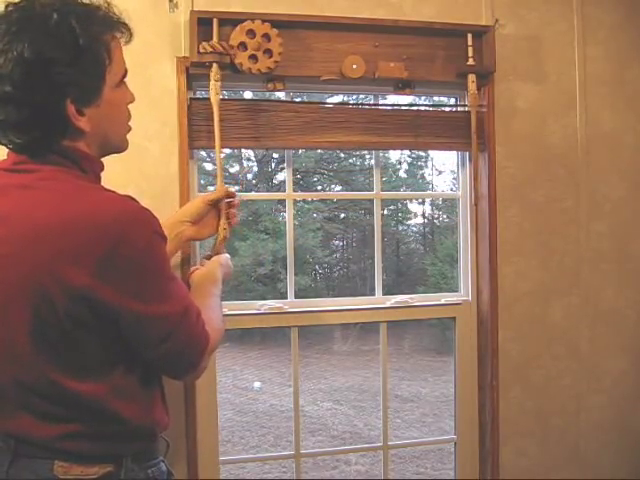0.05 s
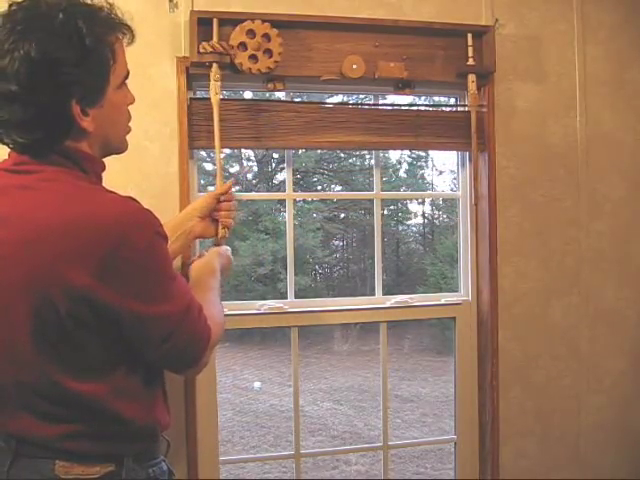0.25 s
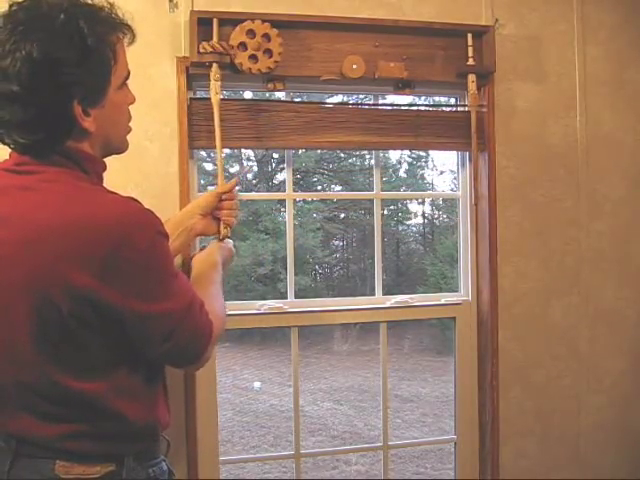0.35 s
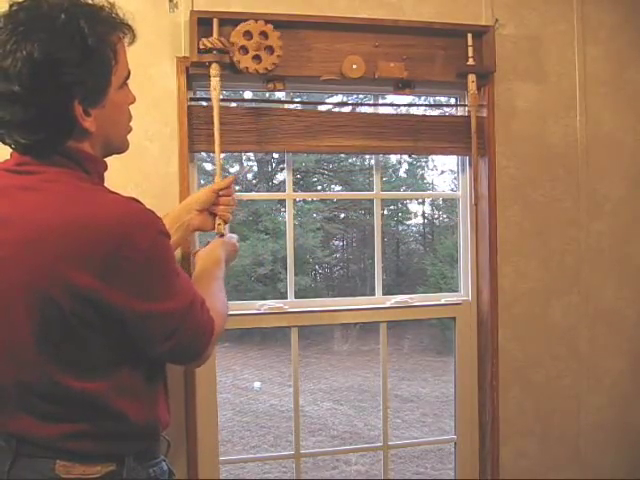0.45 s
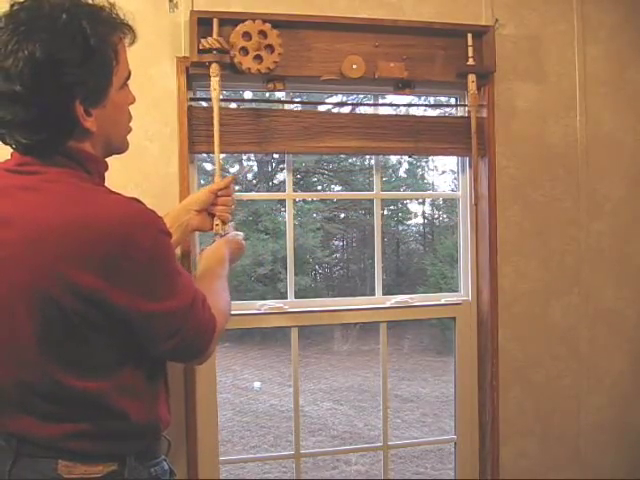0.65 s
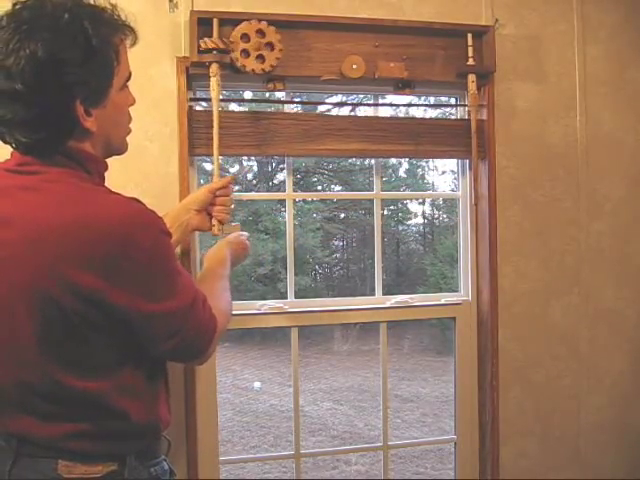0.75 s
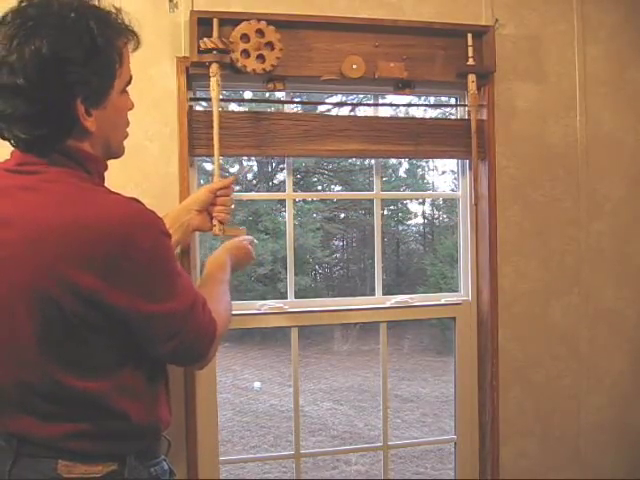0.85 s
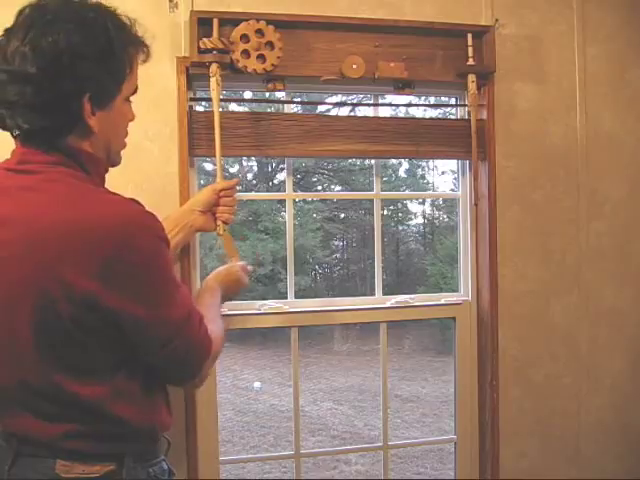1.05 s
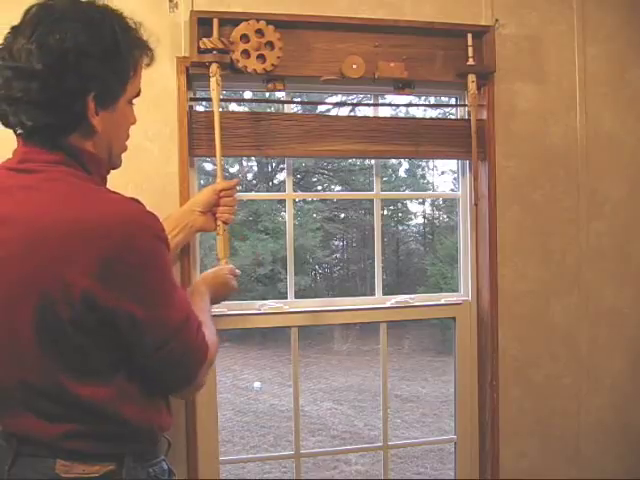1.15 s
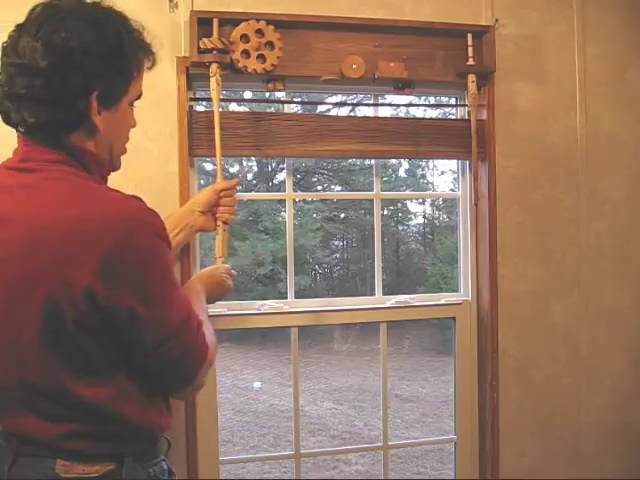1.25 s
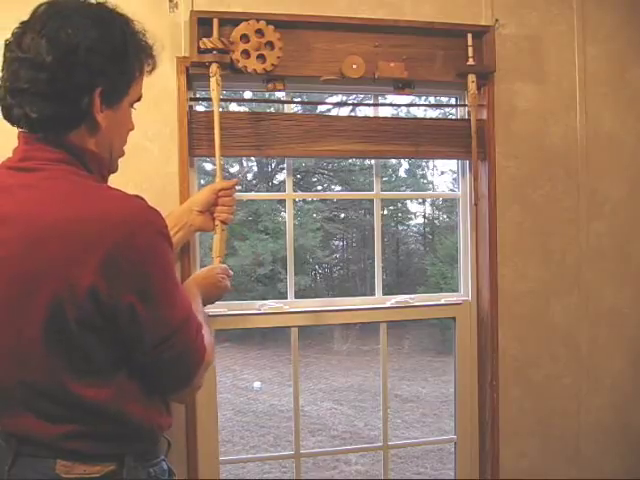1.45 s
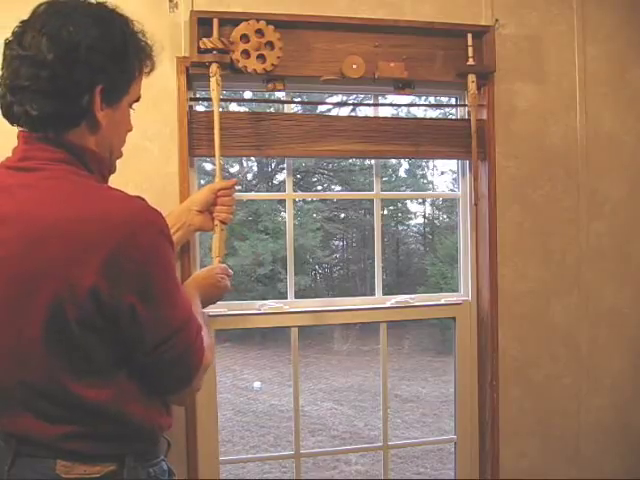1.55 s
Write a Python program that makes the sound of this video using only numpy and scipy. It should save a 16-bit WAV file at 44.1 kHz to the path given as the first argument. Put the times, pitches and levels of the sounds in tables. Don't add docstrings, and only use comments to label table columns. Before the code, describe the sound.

A wooden blind clacks and rattles down beside a window, then settles with light knocks

```python
import sys
import numpy as np
from scipy import signal
from scipy.fft import rfft, irfft, next_fast_len
from scipy.io import wavfile
from scipy.ndimage import uniform_filter1d, map_coordinates

SR = 44100
rng = np.random.default_rng(int(sys.argv[2]) if len(sys.argv) > 2 else 0)


def wav_out(sig):
    wavfile.write(sys.argv[1], SR, np.round(np.clip(np.atleast_2d(sig).T, -1, 1) * 32767).astype(np.int16))


def ratio(d):
    e = np.asarray(d, float) / 20
    return 10 ** e


N = 70560


def unit(x):
    return x / np.sqrt(np.mean(x ** 2) + 1e-20)


def along(points, hz):
    f, v = np.transpose(points)
    return np.interp(np.log(hz + 1), np.log(f + 1), v)


def wobble(rate):
    knots = rng.standard_normal(int(N * rate / SR) + 4)
    return map_coordinates(knots, [np.arange(N) * rate / SR])


def filtered(x, response):
    m = next_fast_len(len(x) + 8192)
    return irfft(rfft(x, m) * response(np.fft.rfftfreq(m, 1 / SR)), m)[:len(x)]


def coloured_noise(grains, spectrum):
    return unit(filtered(grains, lambda hz: ratio(along(spectrum, hz))))


def ring(modes, t, scatter_db, detune):
    hz, db, t60 = np.transpose(modes)[:, :, None]
    level, tuning, sign = rng.standard_normal((3, len(hz), 1))
    decay = np.sign(sign) * ratio(db + scatter_db * level - 60 * t / t60)
    tones = decay * np.sin(2 * np.pi * hz * (1 + detune * tuning) * t)
    return np.sum(tones, axis=0) / np.sqrt(len(hz))


# frequency in Hz, t60 in seconds.
ROOM_DECAY = [(100, 0.36), (500, 0.47), (2500, 0.41), (5500, 0.33)]
ROOM_DB, ROOM_DELAY_S = -2.5, 0.006


def room(x):
    hz, t, z = signal.stft(rng.standard_normal(SR // 3), SR, nperseg=512)
    decay = ratio(-60 * t / along(ROOM_DECAY, hz)[:, None])
    tail = signal.istft(z * decay, SR, nperseg=512)[1]
    delayed = np.pad(x, (round(ROOM_DELAY_S * SR), 0))
    return signal.fftconvolve(delayed, tail / np.linalg.norm(tail))


def add(out, s, sound, room_db):
    for part in (sound, ratio(room_db) * room(sound)):
        out[round(s * SR):][:len(part)] += part


# start in
# seconds, peak of the tick in dB, knock in dB, crack in dB, pitch of the struck piece in Hz.
CONTACTS = [(0.045, -43.5, -33.5, -62, 1341), (0.051, -39, -38, -35, 760), (0.174, -44, -39, -51, 717),
            (0.2337, -30.5, -26, -20, 2500), (.243, -23.5, -25, -27, 775),
            (0.224, -45.5, -29.5, -39, 724), (0.258, -45, -36, -39, 1080), (0.271, -43, -28, -37, 389),
            (0.273, -30.5, -29, -31, 1109), (0.3377, -29.5, -31, -26, 1410),
            (.341, -45, -31.5, -22, 857), (.476, -22, -27.5, -19.5, 437),
            (0.486, -27.5, -22, -27, 1282), (0.493, -13.5, -37.5, -43, 589),
            (.499, -19.5, -21.5, -20, 410.7), (0.5106, -13.5, -20.5, -27.5, 591),
            (.504, -17.5, -23, -14, 685), (.517, -16.5, -20.5, -35, 2580), (.524, -20, -22, -18, 480),
            (.542, -22, -22.5, -19.5, 2210), (.575, -30.5, -24.5, -21, 590),
            (.533, -25, -23.5, -21, 422), (.551, -20.5, -27.5, -24, 405),
            (0.613, -31, -43.5, -41, 480), (.719, -26.5, -29, -26, 886),
                     (.731, -34, -26, -36.5, 401), (.742, -36, -31.5, -36.5, 480),
                     (0.762, -49, -31.5, -34.5, 760), (0.79, -33.5, -30.5, -26, 781),
                     (.856, -36, -40.5, -42, 2432), (.906, -41.5, -31, -37, 889),
                     (.930, -37, -20.5, -35.5, 2980), (.934, -35, -31.5, -30, 707),
                     (.942, -39, -24, -34.5, 1012), (.949, -44.5, -34.5, -30.5, 675),
                     (0.965, -31.5, -23.5, -30, 4760), (1.02, -47, -33.5, -34, 817),
                     (1.181, -41.5, -35.5, -32.5, 400.7), (1.187, -37.5, -23, -27.5, 803),
                     (1.188, -37.5, -25.5, -30, 2993), (1.198, -32, -25.5, -32, 996),
                     (1.223, -38, -34, -34, 860.6), (1.405, -39, -38.5, -36, 840),
                     (1.453, -44, -40.5, -45.5, 453), (1.57, -49.5, -37, -36.5, 385.4),
                     (1.581, -36.5, -31, -27.5, 387)]
# pitch in Hz, level in dB, t60 in seconds.
TEETH_MODES = [(1235, -7, 0.027), (1668, -5, 0.0073), (1872, -12, 0.046), (2210, -4.5, 0.043),
               (2384, -6, 0.063), (2500, -5, 0.043), (2614, 0.5, 0.039), (2843, -2.5, 0.028),
               (3006, 2.5, 0.024), (3295, -6.5, 0.026), (3990, -11, 0.061), (4615, -9, 0.02)]
HOUSING_MODES = [(305.5, -2.5, 0.042), (362.4, -2, 0.15), (402.6, -3, 0.089), (480, -2.5, 0.035),
                 (538.5, -12.5, 0.042), (603, -4.5, 0.059), (717, -5.5, 0.069), (760, -4, 0.069),
                 (854.5, 1.5, 0.11), (928.4, -3, 0.064), (1038.4, -4, 0.13), (1290, -8.5, 0.019),
                 (1428, -13.5, 0.066)]
# frequency in Hz, level in dB per Hz.
CRACK_SPECTRUM = [(300, -27.5), (800, -6), (1500, 4), (3000, -6.5), (4500, 3), (6000, -14)]
PIECE_DB, PIECE_CYCLES = -4, 55
CRACK_DB, CRACK_T60_S = -7.5, 0.015
CHATTER_DB, CHATTER_T60_S, CHATTER_SHARE = -9.5, 0.04, 0.022
SCATTER_DB, DETUNE = 2, 0.0088
BLOW_RISE_S = 0.00034
SPOT_DB_PER_OCTAVE = 4.5


def mechanism():
    out, t = np.zeros(N + 2 * SR), np.arange(SR // 6) / SR
    for s, tick_db, knock_db, crack_db, piece_hz in CONTACTS:
        size, chance = rng.random((2, len(t)))
        rebounds = (2 * size - 1) * (chance < CHATTER_SHARE)
        chatter = rebounds * ratio(CHATTER_DB - 60 * t / CHATTER_T60_S)
        chatter[0] = 1

        crack = coloured_noise(rng.standard_normal(len(t)), CRACK_SPECTRUM)
        crack = crack * ratio(CRACK_DB - 60 * t / CRACK_T60_S)

        near = [(hz, db - SPOT_DB_PER_OCTAVE * abs(np.log2(hz / piece_hz)), t60)
                for hz, db, t60 in HOUSING_MODES]
        piece = ratio(PIECE_DB - 60 * t * piece_hz / PIECE_CYCLES) * np.sin(2 * np.pi * piece_hz * t)
        knock = ring(near, t, SCATTER_DB, DETUNE) + piece
        tick = ring(TEETH_MODES, t, SCATTER_DB, DETUNE)
        blow = (ratio(tick_db) * tick + ratio(knock_db) * knock) * (1 - np.exp(-t / BLOW_RISE_S))
        clatter = signal.fftconvolve(blow, chatter / np.linalg.norm(chatter))[:len(t)]
        add(out, s, clatter + ratio(crack_db) * crack, ROOM_DB)
    return out[:N]


# start in seconds, peak in dB, pitch in Hz, cycles to die away by 60 dB.
SNAP_BLOWS = [(.2332, -18, 2500, 18), (0.2424, -22, 1090, 10.4), (0.2727, -19, 990, 7.4),
              (0.2737, -25, 402, 9.5), (.2785, -26, 646, 6.4), (0.3381, -14, 3210, 5.4),
              (0.3399, -24, 1425, 13), (0.3407, -18.5, 3760, 11), (.342, -30, 834, 50),
              (.4805, -25.5, 687, 6.1), (0.4919, -20, 3030, 20), (0.4992, -14, 425, 12),
              (.505, -13.5, 895, 6), (0.512, -16, 3005, 25), (0.512, -19, 2620, 40), (.516, -21, 585, 16),
              (0.5283, -16, 200.3, 16), (.531, -17.5, 2500, 19), (0.5491, -18, 112, 8),
              (0.553, -15.5, 2280, 25), (.559, -22, 4520, 26), (0.7183, -22, 3000, 4),
              (0.9325, -34.5, 3030, 14), (1.1875, -35, 3060, 8), (1.222, -34, 858, 60),
              (1.5807, -36, 2610, 9.6)]
SNAP_ROOM_DB = -4.5


def snaps():
    out, t = np.zeros(N + 2 * SR), np.arange(SR // 8) / SR
    for s, db, hz, cycles in SNAP_BLOWS:
        add(out, s, ratio(db - 60 * t * hz / cycles) * np.sin(2 * np.pi * hz * t), SNAP_ROOM_DB)
    return out[:N]


# start in seconds, level in dB, pitch in Hz,
# width in Hz, t60 in seconds.
LINGERING_PARTS = [(.340, -31, 855, 28, .35), (.338, -30, 1450, 60, .25), (.338, -35.5, 3800, 450, 0.094),
                   (.240, -34.5, 1700, 700, .3), (.508, -23, 2850, 390, 0.12),
                   (.517, -24.5, 2300, 200, 0.14), (.565, -36, 2400, 250, .35),
                   (.792, -48.5, 2920, 60, 0.55), (0.71, -39.5, 2620, 90, 0.14),
                   (0.65, -41, 2920, 50, 0.16), (.875, -36, 110, 8, .5), (1, -42.5, 260, 22, 0.18),
                   (1.03, -40.5, 200, 30, 0.22), (1.19, -42, 2650, 160, .2), (1.195, -41, 855, 30, .4),
                   (1.41, -42, 145, 23, .2), (1.44, -45.5, 380, 130, .3), (.05, -44, 410, 67, 0.22)]
LINGER_RISE_S = 0.002


def linger():
    out, t = np.zeros(N + SR), np.arange(SR // 4) / SR
    for s, db, centre_hz, width_hz, t60 in LINGERING_PARTS:
        jitter = uniform_filter1d(rng.standard_normal(len(t)), size=40)
        wander = np.cumsum(jitter) * np.sqrt(2 * np.pi * abs(width_hz) / SR)
        shaken = np.sqrt(2) * np.sin(2 * np.pi * centre_hz * t + wander)
        fade = (1 - np.exp(-t / LINGER_RISE_S)) * np.cos(np.pi / 2 * t / t[-1])
        out[round(s * SR):][:len(t)] += ratio(db - 60 * t / t60) * fade * shaken
    return out[:N]


# start in seconds, wall boom in dB, frame thud in dB.
WINDOW_JOLTS = [(0.056, -45, -37), (0.241, -33, -40.5), (.272, -37.5, -35), (.478, -25.5, -20),
                (.495, -24, -17), (.512, -16.5, -14), (.533, -25, -24), (0.551, -25.5, -26.5),
                (0.616, -28.5, -29.5), (0.725, -32, -29.5), (0.794, -33.5, -28), (0.857, -32.5, -36),
                (0.931, -30, -34.5), (0.949, -26, -32), (1.187, -39, -30.5), (1.252, -50, -32),
                (1.405, -43, -38), (1.5, -35.5, -46.5), (1.58, -37, -31.5)]
# pitch in Hz, level in dB, t60 in seconds.
WALL_MODES = [(37.45, -6, .6), (58.84, -11, 0.29), (108.7, 0, .4), (144.1, -4, 0.23)]
FRAME_MODES = [(198, 1.5, .24), (218.5, -10, 0.11), (251.2, -3, 0.089), (317.2, -9, 0.092)]
THUD_RISE_S, THUD_ROOM_DB = 0.0051, -9.5


def window():
    out, t = np.zeros(N + 2 * SR), np.arange(SR // 3) / SR
    fade = (1 - np.exp(-t / THUD_RISE_S)) * np.cos(np.pi / 2 * t / t[-1])
    for s, boom_db, thud_db in WINDOW_JOLTS:
        boom = ratio(boom_db) * ring(WALL_MODES, t, 1.9, 0.0039)
        thud = ratio(thud_db) * ring(FRAME_MODES, t, 1.5, 0.006)
        add(out, s, (boom + thud) * fade, ROOM_DB + THUD_ROOM_DB)
    return out[:N]


# start in seconds, length in seconds, level in dB.
SLAT_SCRAPES = [(0.043, 0.05, -47), (0.225, 0.067, -36.5), (0.357, 0.049, -46.5), (0.472, 0.018, -28.5),
                (0.493, 0.062, -24), (0.553, 0.099, -33), (0.713, 0.022, -33.5), (0.778, 0.037, -40),
                (0.934, 0.036, -34.5), (1.173, 0.046, -37.5), (1.56, 0.039, -46)]
# frequency in Hz, level in dB per Hz.
SLAT_SPECTRUM = [(90, -24.5), (150, 0), (400, -1), (700, -5.5), (1200, -9.5), (2000, -18.5), (3500, -17),
                 (5500, -22)]
SCRAPE_RISE_S, SCRAPE_FALL_S, SCRAPE_GRAIN_DB = 0.0044, 0.025, 3.5


def slats():
    s, length, db = np.transpose(SLAT_SCRAPES)[:, :, None]
    t = np.arange(N) / SR - s
    fall = np.exp(-np.clip(t - length, 0, None) / SCRAPE_FALL_S)
    shape = np.clip(t / SCRAPE_RISE_S, 0, 1) * fall
    level = np.sqrt(np.sum((ratio(db) * shape) ** 2, axis=0))
    grains = rng.standard_normal(N) * ratio(SCRAPE_GRAIN_DB * wobble(300))
    return level * coloured_noise(grains, SLAT_SPECTRUM)


# time in seconds, level in dB.
ROPE_LEVEL = [(0.0, -47.5), (0.169, -55), (0.279, -32.5), (0.41, -35.5), (0.458, -39), (0.712, -42.5),
              (1.02, -40), (1.131, -39), (1.26, -45.5), (1.385, -58), (1.6, -58)]
# frequency in Hz, level in dB per Hz.
RUB_SPECTRUM = [(150, -32.5), (300, -11), (800, -3), (1100, -3), (1500, -4.5), (2700, -10.5), (3600, -14),
                (5500, -29)]
RUB_DB, RUB_GRAIN_DB = -4, 2


def rope():
    s, db = np.transpose(ROPE_LEVEL)
    level = ratio(RUB_DB + np.interp(np.arange(N) / SR, s, db))
    grains = rng.standard_normal(N) * ratio(RUB_GRAIN_DB * (wobble(120) + wobble(25)))
    return level * coloured_noise(grains, RUB_SPECTRUM)


# time in seconds, pitch in Hz, level in dB.
SQUEAK_PATH = [
    (1.096, 950, -60),
    (1.108, 962, -53),
    (1.141, 1024, -48.5),
    (1.17, 1050, -46),
    (1.184, 1030, -59),
]


def squeak():
    s, hz, db = np.transpose(SQUEAK_PATH)
    t = np.arange(N) / SR
    turns = np.cumsum(np.interp(t, s, hz) * (1 + 0.0091 * wobble(80))) / SR
    level = ratio(np.interp(t, s, db, -120, -120) + 1.2 * wobble(60))
    return np.sqrt(2) * level * np.sin(2 * np.pi * turns)


# frequency in Hz, level in dB per Hz.
AIR_SPECTRUM = [(15, -4.5), (35, 1), (70, -4), (150, -12.5), (400, -14.5), (1000, -27), (2500, -35.5),
                (5500, -31)]
AIR_DB, AIR_SWAY_DB = -43, -1
WHINE_HZ, WHINE_WIDTH_HZ, WHINE_DB = 1814, 30, -59.5


def air():
    rumble = unit(filtered(rng.standard_normal(N), lambda hz: ratio(along(AIR_SPECTRUM, hz)) * (hz > 10)))
    whine = unit(filtered(rng.standard_normal(N),
                          lambda hz: 1 / (1 + (2 * (hz - WHINE_HZ) / WHINE_WIDTH_HZ) ** 2)))
    return ratio(AIR_DB + AIR_SWAY_DB * wobble(6.1)) * rumble + ratio(WHINE_DB) * whine


def scene():
    blows = mechanism() + snaps() + linger()
    return (blows + window() + slats() + rope() + squeak() + air())[None]


def low_pass(x):
    return signal.sosfilt(signal.butter(12, 15770, fs=SR, output="sos"), x)


CAMERA_RATE_HZ, HOLD_PHASE = 11024, 0.3
EDGE_HZ, TOP_HZ = 5800, 15800
STEP, OFFSET = 0.985 / 128, -0.0184


def record(dry):
    soft = filtered(dry[0], lambda hz: 1 / np.sqrt(1 + (hz / EDGE_HZ) ** 16)) + OFFSET
    slot = np.floor(np.arange(N) * CAMERA_RATE_HZ / SR + HOLD_PHASE) - HOLD_PHASE
    held = np.interp(slot * SR / CAMERA_RATE_HZ, np.arange(N), soft)
    stepped = np.round(held / STEP) * STEP
    mix = filtered(stepped, lambda hz: hz < TOP_HZ)[None]
    return low_pass(mix)


dry = scene()
out = record(dry)
wav_out(out)
```